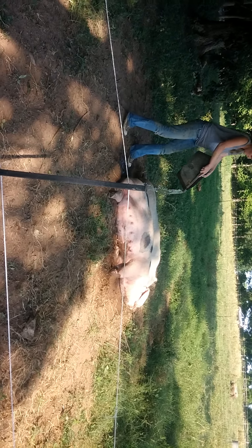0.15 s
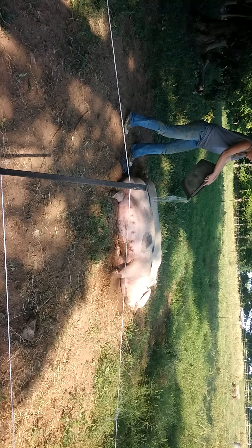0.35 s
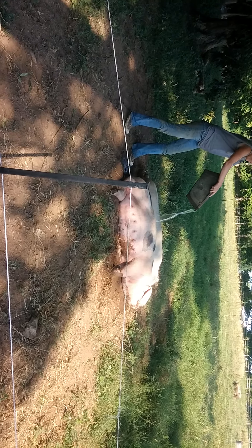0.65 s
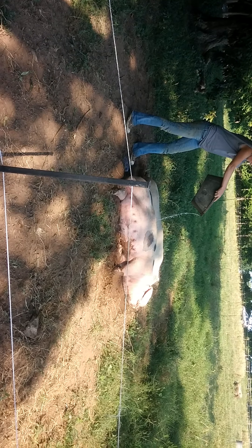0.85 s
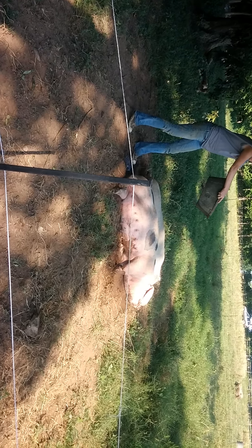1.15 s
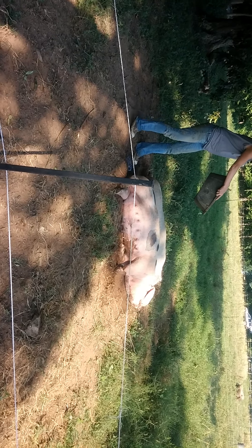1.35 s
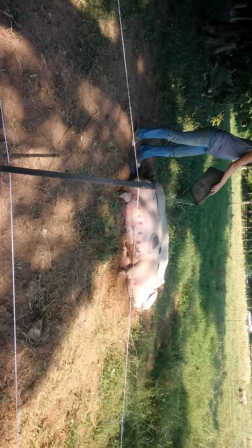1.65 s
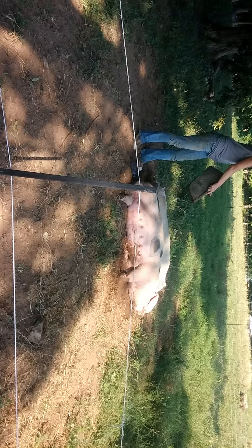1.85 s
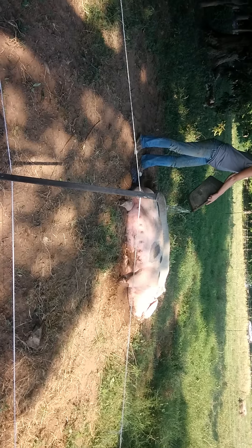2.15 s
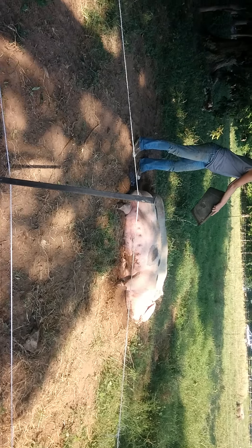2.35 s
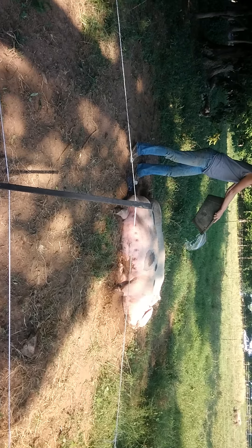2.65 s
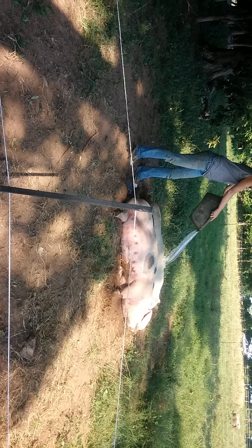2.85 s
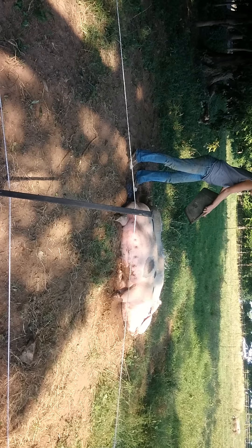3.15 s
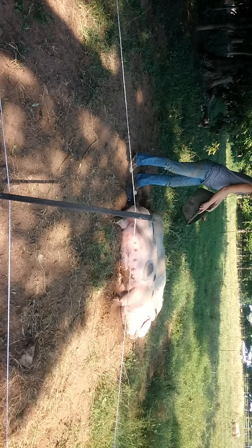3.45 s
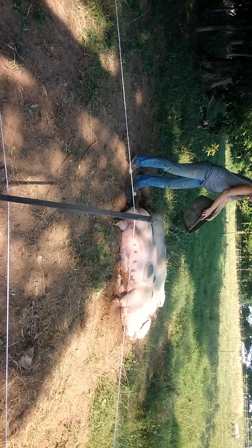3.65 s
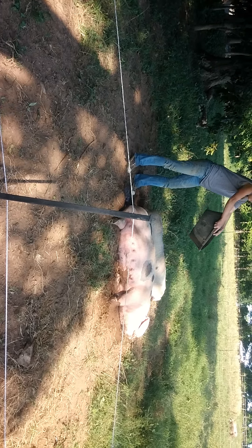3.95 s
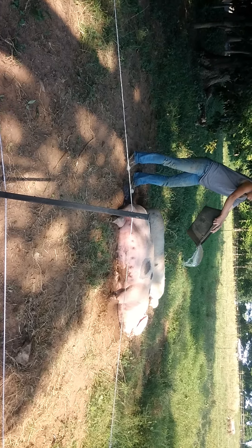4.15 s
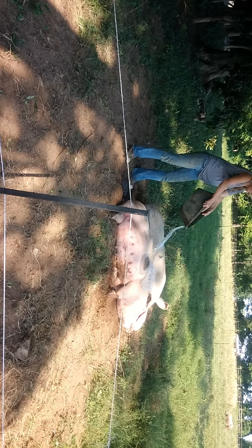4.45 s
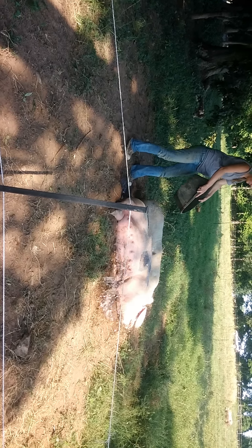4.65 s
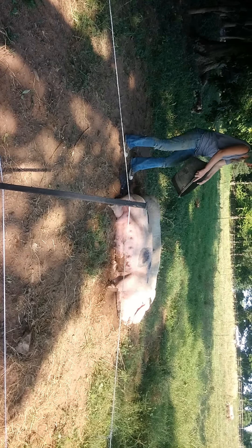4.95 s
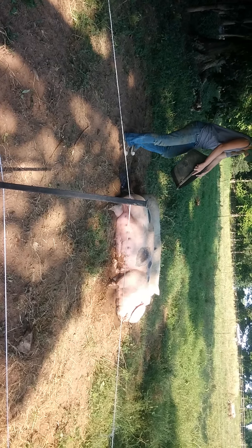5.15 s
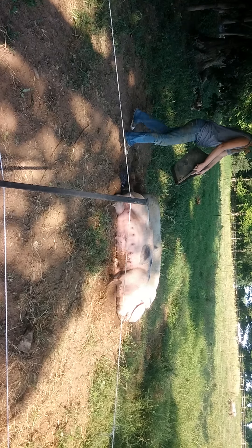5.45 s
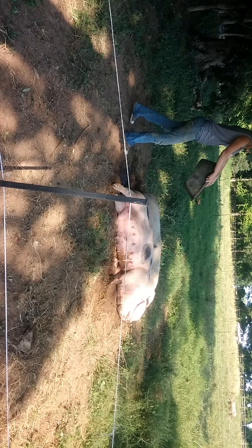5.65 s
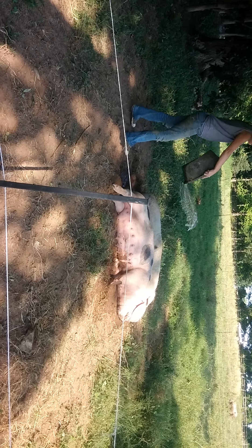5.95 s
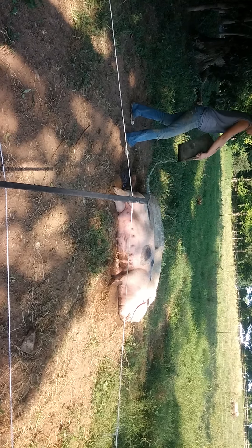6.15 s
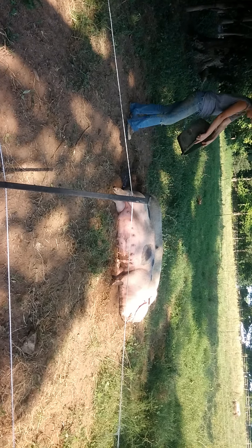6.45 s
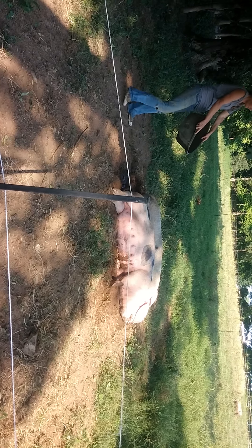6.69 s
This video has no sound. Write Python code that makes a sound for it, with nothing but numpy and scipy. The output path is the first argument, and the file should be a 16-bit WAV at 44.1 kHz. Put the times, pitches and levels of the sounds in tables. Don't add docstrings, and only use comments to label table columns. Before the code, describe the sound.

Outdoors, close to a large pig, with lumpy low wind on the microphone, heavy on the left early and shifting right after about 4.5 seconds. At 0 a wet snuffle and crisp ticking drops, a faint rattle at 0.2. A low, rough, fluttering grunt comes at 0.6 to 0.9, with a strong wind thump at 1.2, another grunt at 1.5, and snuffling at 1.7. Light drops patter from 1.8 to 2.4; a short rattle and nasal breath follow around 2.5 to 2.8. Soft splashes land at 3.0 to 3.2. Grunts return at 3.4 and 4.15, then a sharp double slap of water at 4.5 with trailing drops. A tight louder grunt at 5.0 runs into nasal rattles until 5.4. Another grunt at 5.8, rattles at 6.0 to 6.2, the hardest splash at 6.27, and a strong closing grunt at 6.7. Brief fades dip the sound, deepest near 1.4, 2.9, 3.3, 3.7 and 5.55.

```python
import sys
import numpy as np
from scipy import signal
from scipy.fft import rfft, irfft, next_fast_len
from scipy.io import wavfile
from scipy.ndimage import map_coordinates

SR = 44100
rng = np.random.default_rng(int(sys.argv[2]) if len(sys.argv) > 2 else 0)


def dump_mix(stems):
    frames = np.atleast_2d(stems).T
    limited = np.clip(frames, -1, 1)
    pcm = np.round(limited * 32767).astype(np.int16)
    wavfile.write(sys.argv[1], SR, pcm)


def voltage_ratio(level):
    return 10 ** (np.asarray(level, float) / 20)


N = 300762

# peak in seconds, level in dB, rise and fall in seconds per 20 dB, nostrils over nose in dB.
SNUFFLES = [(0, -40, .06, -0.08, -18), (0.278, -54.5, 0.4, 0.3, -12), (.69, -47, 0.02, 0.23, 0),
            (.91, -50.5, 0.1, 0.2, 2.5), (1.51, -59.5, 9.5, 0.54, -13), (1.711, -40.5, 0.13, 0.2, -8),
            (2.56, -59, 0.3, 0.5, -16), (2.75, -39.5, 0.19, 0.23, -6.5), (3.08, -52.5, 0.2, -0.07, 6),
            (3.42, -50, -0.9, 0.6, -3), (3.81, -52.5, -0.14, 0.33, 1), (4.02, -58.5, -1.2, 1, -6),
            (4.23, -54, 0.2, 0, -9), (4.441, -41.5, 0.12, 0.35, -10), (4.78, -45, 0.12, 0.12, -9),
            (5.01, -49, 0.2, 0.06, -6), (5.11, -62, 0.5, 0.62, 8), (5.3, -47.5, 0.16, 0.09, -3),
            (5.83, -59, -0.2, 0.5, -3), (6.08, -54, 0.23, 0.5, 6.5), (6.28, -42.5, -0.07, 0.3, -7),
            (6.72, -61, -6, 5, -11), (6.8, -66.5, 0.17, -4, 15.5)]
# centre in Hz, width in Hz, level in dB.
NOSE = [(490, 170, 3), (760, 170, -8), (1180, 175, -5.5), (1870, 310, 2)]
SNIFF = [(796, 410, 0.5), (1063, 76, -6), (1634, 310, -5), (2280, 390, -9)]
NOSTRILS = [(2550, 540, 7), (3230, 900, -3.5), (4690, 200, -4)]
# start in seconds, gain in dB.
FLUTTERS = [(0.708, 6), (0.834, 13.5), (1.618, 8.5), (1.643, 10.5), (1.679, 11), (1.72, 5), (1.764, 8.5),
            (2.656, 3.5), (2.682, 5), (2.732, 2), (2.76, 3), (2.786, 8), (2.824, 11.5), (4.405, 7),
            (4.785, 8.5)]
FLUTTER_S = 0.0066
# time in seconds, share from 0 to 1.
WIDE_PASSAGE = [
    (3.7, 0),
    (3.8, 1),
    (4.1, 0.93),
    (4.3, 0.031),
]
WIDE_TUNING = 0.93
SWELL_ROUND = 1.11

# peak in seconds, level in dB, rise and fall in seconds per 20 dB,
# spray over body in dB.
POURS = [(0, -40.5, .05, 0.18, -4), (0.182, -45, -0.8, 0.23, -8), (.45, -63, 3, 1.24, 5),
         (0.714, -47.5, 0.24, 0.61, -7), (1.0, -62.5, -1, 0.3, -3), (1.799, -48, 0.22, 0.22, -1.5),
         (1.95, -64.5, 0.3, 0.16, 12), (2.4, -68.5, -1.3, 0.3, 11.5), (2.7, -55.5, 1.7, 0.5, -6),
         (3.109, -37, 0.28, 0.35, -5.5), (3.21, -45.5, 0.33, 0.15, -1.5), (3.6, -59, 0, 0.45, -1),
         (4.1, -65, 1.5, -1, -3), (4.532, -38, 0.12, 0.2439, -3), (4.608, -31.5, 0.21, 0.17, -8),
         (4.841, -52, 0.24, 0.16, 9.5), (5.15, -57, 2, 0.66, -2.5), (5.4, -55, 0.4, 0.1, -4),
         (6.1, -58.5, 0.06, 1.5, 0), (6.296, -32, 0.0644, 0.1354, -5.5), (6.369, -42.5, 0.17, 0.2, -3.5),
         (6.7, -66.5, 1.9, 7, 6.5)]
# start in seconds, level in dB, time to die in seconds.
SURGES = [
    (0.088, -60, 0.56),
    (2.952, -54, 0.5),
    (4.786, -47.5, 0.35),
    (6.243, -30.5, 0.073),
    (3.028, -38, 0.11),
    (6.282, -27, 0.05),
]
# start in seconds, peak in dB, pitch in Hz.
DROPS = [(0.097, -23, 3600), (0.102, -27, 2750), (0.134, -25.5, 3300), (0.181, -30.5, 2590),
         (0.204, -22, 4000), (1.912, -35, 8000), (0.116, -29.5, 3900), (1.801, -28.5, 2550),
         (1.905, -32, 2650), (2.03, -30, 6950), (2.193, -37.5, 4000), (2.338, -27.5, 3840),
         (2.404, -28.5, 2560), (0.167, -30, 2650), (2.431, -29.5, 3300), (2.957, -23.5, 2550),
         (2.195, -37, 8000), (3.188, -24, 2950), (3.212, -21, 2470), (4.513, -10.5, 3450),
         (4.562, -12.5, 2110), (4.653, -21.5, 1760), (2.563, -36, 8000), (6.25, -19, 6600),
         (6.265, -11, 3220), (6.274, -11, 2530), (6.291, -22, 2750), (6.296, -15, 1650),
         (6.355, -15.5, 3570), (6.385, -24, 2550), (2.978, -35, 3150), (2.995, -31.5, 2380),
         (2.08, -37.5, 7300), (3.039, -26, 3360), (3.039, -30, 980), (3.045, -24, 2480), (3.076, -23, 2550),
         (3.092, -22, 3440), (3.113, -24, 2600), (3.115, -29, 1000), (3.226, -31, 2620),
         (4.516, -16.5, 3840), (4.57, -14, 2460), (4.606, -24, 1520), (4.626, -21, 1750),
         (4.745, -30, 3200), (4.858, -31, 2700), (2.191, -42.5, 1930), (2.405, -30, 3300),
         (0.002, -20.5, 3570), (0.142, -28.5, 3500), (6.303, -19.5, 2420), (6.287, -22, 1260),
         (1.948, -37, 8000), (6.282, -26, 1500), (6.29, -16, 1820), (6.303, -15.5, 1760),
         (6.299, -21, 1114), (6.306, -27, 1330), (6.274, -24.5, 1310)]
# start in seconds, peak in dB.
SMACKS = [
    (2.555, -47),
    (3.075, -38),
    (3.212, -32),
    (4.511, -20.5),
    (4.537, -21),
    (6.244, -27.5),
    (6.2726, -12.5),
    (6.357, -26),
    (6.3812, -28),
]
# frequency in Hz, density in dB per Hz.
SPLASH = [(1100, -11.5), (1800, -11), (2600, 4.5), (3400, 5), (4400, -3.5), (6500, -31)]
SPRAY = [(2500, -2.5), (5200, -2.5), (7300, 2), (9500, -4.5), (13000, -19), (16000, -23)]
SMACK = [(500, -18), (1000, 2.5), (2600, 1.5), (6500, 1), (10000, -16), (16000, -28)]
MIST = [(11000, -42), (14000, -7), (16000, -4)]
SPRAY_LINGERS = 1.15
PATTER_DB, PATTER_HZ = 0.5, 3110
MIST_DB, MIST_GROWS = -72, 1.2

# peak in seconds, level in dB, rise and fall in seconds per 20 dB.
LEFT_GUSTS = [(.2, -47, 4, .4), (.47, -28, -0.4, 0.17), (.7, -50, -2.5, 3), (1.04, -31.5, -1.2, 2),
              (1.22, -20.5, 0.04, 0.18), (1.65, -17.5, 0.1, 0.15), (1.9, -25.5, 0.25, 0.64),
              (2.08, -29, 0, 0.7), (2.3, -28, -4, 0.08), (2.5, -21, 0.09, -0.14), (2.7, -33.5, -0.5, 0),
              (3.15, -54, 3, -3), (3.3, -39, -0.3, 2), (3.57, -25.5, 0, 0.8), (3.9, -24.5, 0.1, 0.36),
              (4.2, -31, 0.6, 0.1), (4.5, -33.5, -1.5, 0), (4.8, -34.5, -1.5, 1.15), (5.1, -30, 0.2, 0.4),
              (5.45, -39, 0, 0.7), (5.75, -35, 0.2, 0.5), (6.2, -31.5, 0.22, 0.5), (6.5, -33.5, -1, 0.5),
              (6.73, -27, -0.1, -2.3)]
RIGHT_GUSTS = [(.3, -63, .8, 0.265), (.7, -39.5, 0.074, 0.093), (.95, -58, 0.36, 0.14),
               (1.62, -43, 0.19, 0.19), (2.6, -63.5, 0.18, .15), (2.8, -53, 0.085, 0.18),
               (3.2, -62, 0.34, .2), (3.5, -50, 0.159, 0.16), (4.0, -51.5, 0.6, 0.33),
               (4.5, -40.5, 0.23, 0.56), (4.72, -33, 0.27, 0.25), (5.0, -28.5, 0.074, 0.075),
               (5.35, -41.5, 0.25, 0.19), (5.8, -36.5, 0.1, 0.19), (6.0, -36, 0.3, 0.095),
               (6.2, -21.5, 0.054, 0.11), (6.4, -27, 0.083, 0.3), (6.56, -23.5, 0.32, 0.2),
               (6.8, -35.5, 0.4, .3)]
# middle in seconds, depth in dB, half length in seconds.
LULLS = [(0.02, 8, 0.05), (0.66, 6, 0.06), (0.82, 30, 0.12), (0.92, 13, 0.058), (2.7, 3.5, 0.039),
         (4.03, 2.5, 0.077), (1.49, 7, 0.038), (2.17, 10, 0.06), (2.97, 6, .07), (3.11, 5, 0.05),
         (4.36, 7, 0.14), (5.62, 1.5, 0.034), (6.14, 1, 0.043)]
# frequency in Hz, density in dB per Hz.
RUMBLE = [(32, -23), (62, 2), (80, 3), (125, -2.5), (180, -12.5), (270, -28.5), (420, -46.5), (700, -110)]
# middle in seconds, peak in dB, pitch in Hz, port (0 left, 1 right).
THUMPS = [(1.203, -2.5, 120, 0), (1.652, -17, 80, 0), (1.882, -12, 99, 0), (1.948, -7.5, 95, 0),
          (2.251, -9.5, 144.6, 0), (3.812, -9.5, 96.4, 0), (3.88, -15, 170, 0), (4.961, -9, 110, 1),
          (3.458, -13.5, 114, 0), (5.118, -16, 84, 0), (5.33, -21.5, 118, 0), (.422, -23, 105, 0),
          (0.477, -20.5, 115, 0), (0.537, -21, 95, 0), (6.178, -20.5, 91, 1), (6.212, -21, 129, 1),
          (3.49, -19.5, 100, 0), (5.694, -23, 90, 0)]

# start in seconds, spacing in seconds, flaps, first level in dB, loss in dB a flap.
RATTLES = [(0.219, 0.036, 4, -40, 0), (0.872, .034, 2, -25.5, -2.5), (2.489, 0.041, 2, -40.5, -16.5),
           (2.564, .018, 2, -25, 18), (5.011, .03, 2, -30.5, 6.5), (5.056, 0.045, 2, -38.5, 4.5),
           (5.126, 0.026, 2, -39, -7.5), (5.176, 0.0288, 3, -29, 3.5), (5.292, 0.03, 2, -31, 9),
           (5.338, 0.022, 3, -32.5, 6), (5.974, .029, 2, -34, -2), (6.03, 0.018, 2, -40.5, 4),
           (6.128, 0.012, 2, -40, 2), (6.16, 0.013, 3, -34, 1), (6.207, .036, 2, -30, -6)]
# first slow flap in seconds, spacing in seconds, slow flaps,
# quick lead-in flaps, full level in dB.
GRUNTS = [
    (0.651, .033, 2, 3, -18),
    (1.484, 0.032, 3, 1, -15.5),
    (3.424, 0.036, 1, 3, -18.5),
    (4.153, 0.0353, 3, 1, -17),
    (4.968, .018, 2, 1, -14),
    (5.807, 0.037, 1, 3, -18.5),
    (6.717, 0.033, 3, 1, -13.5),
]
LEAD_S, QUICK_S = 0.0225, 0.0175
SHORT_DB, SHORT_LEFT = 18, 0.47
CLOSING_DB = -16.5
# frequency in Hz, level in dB, time to fall 60 dB in seconds.
CHEST = [(144.5, -5.5, 0.22), (209.4, 5, 0.056), (286.4, 6.5, 0.049)]
THROAT = [(488, -8, 0.047), (764, 6, 0.018)]
MOUTH = [(1195, -1.2, 0.044)]
PALATE = [(1750, -6, 0.037)]
SNOUT = [(2650, -3, 0.024), (3300, -4, 0.018), (3840, -3.5, 0.023)]
# time in seconds, snout over throat in dB.
NASAL = [(0.26, 3), (0.65, -13), (0.685, -9.5), (0.875, 4), (0.905, -6.5), (1.46, -10), (1.485, -2),
         (1.517, -8), (1.55, -18), (2.5, -13.5), (3.385, -14), (3.41, -6), (4.13, -16), (4.155, 3),
         (4.19, -13), (4.23, -20), (4.97, -8), (5.05, 15), (5.15, 7), (5.22, 9), (5.33, -4.5),
         (5.78, -15.5), (5.81, 5), (6.0, 5), (6.15, -11.5), (6.75, -3)]
# time in seconds, mouth ring in dB, palate ring in dB.
OPEN = [(0.25, -18, -21), (0.66, 3, 0.5), (0.88, -0.5, -1.5), (1.48, -2.5, 0), (1.55, 0, -4),
        (2.55, -2, -4.5), (3.42, -1, 0.5), (4.15, -2, 8), (4.19, 1.5, -1.5), (4.22, -2.5, 0.5),
        (4.97, 4, 2.5), (5.03, 1.5, 11), (5.15, 0.5, 7), (5.21, -7.5, -8.5), (5.33, 0, -17),
        (5.78, -0.5, -10), (5.807, 7.5, -0.5), (6.0, -1.5, -2.5), (6.2, -4.5, -17.5), (6.75, 1.5, -3.5)]
# time in seconds, frequency in Hz.
PALATE_HZ = [(0.65, 1805), (0.87, 1740), (1.48, 1840), (1.52, 1750), (4.22, 1826), (4.97, 1670),
             (4.99, 1630), (5.05, 1856), (5.18, 1710), (5.34, 1800), (5.8, 1660), (6.0, 1710), (6.72, 1870),
             (6.75, 1700)]
# time in seconds, upper over lower snout rings in dB.
TIP = [(.66, -2), (.875, 7.5), (.905, -3), (1.485, -11), (1.517, 2.5), (2.55, -5), (3.42, -15.5),
       (4.155, -7), (4.19, 2.5), (4.225, 1), (4.97, 6.5), (4.99, 6.5), (5.1, 0), (5.125, 11), (5.18, 11.5),
       (5.235, -9), (5.32, 2), (5.81, -2.5), (5.974, -6), (6.003, 0), (6.75, 6)]
# time in seconds, lower snout ring in Hz, top over middle ring in dB.
FLARE = [(.65, 2624, -6), (.875, 2640, -6), (1.485, 2530, -16), (1.55, 2500, -2), (2.55, 2570, -6),
         (3.42, 2580, -9.5), (4.155, 2550, -16), (4.19, 2550, 10), (4.97, 2930, -14), (4.99, 3050, -4),
         (5.04, 2840, 6), (5.1, 2650, -1), (5.2, 2690, -5), (5.3, 2650, 8), (5.81, 2630, 9),
         (5.974, 2650, -10), (6.003, 2650, 10), (6.72, 2550, -13), (6.75, 2810, 4.5)]
CHEST_DB, CHEST_STEADY, CHEST_SHUT = -6.5, 0.25, 0.4
DULL, MUFFLED = 0.35, 0.66
THROAT_SHUT = 0.33
LEAKY, PUFF_LEAD_S = 0.45, 0.0043

# frequency in Hz, density in dB per Hz.
HISS = [(60, -2.5), (800, -2), (3000, -10), (5000, -13), (12500, -19.5), (16000, -35)]
# frequency in Hz, left minus right in dB.
LEFT_DB = [(300, 4.5), (520, -9), (850, 3.5), (1500, -8.5), (2500, -16), (4500, -14.5), (8000, -13.5),
           (14000, -8)]
# frequency in Hz, lead in radians.
LEFT_LEAD = [(300, 2.69), (700, 2.437), (1100, 1.64), (2700, 1.68), (4000, 3.6), (16000, 32.9)]
# frequency in Hz, share from 0 to 1.
ALIKE = [(1200, 1), (3500, 0.41), (12000, 0.19)]
# middle in seconds, depth in dB, half length in seconds.
FADES = [(0.065, 17.5, 0.045), (0.573, 10, 0.016), (0.862, 7.5, 0.02), (1.431, 25.5, 0.036),
         (2.053, 8, 0.046), (2.362, 8.5, 0.045), (2.912, 36, 0.059), (3.297, 24, 0.055), (3.727, 26, 0.092),
         (4.319, 5.5, 0.0282), (4.698, 6, 0.062), (5.271, 15, 0.036), (5.45, 14, 0.038),
         (5.558, 26, 0.0338), (5.944, 7.5, 0.044), (6.101, 6, 0.022)]


def unit(x):
    return x / np.sqrt(np.mean(x ** 2, axis=-1, keepdims=True) + 1e-20)


def along(points, hz):
    f, v = np.transpose(points)
    return np.interp(np.log(hz + 1), np.log(f + 1), v)


def wobble(rate):
    return map_coordinates(rng.standard_normal(N // 100), [np.arange(N) * rate / SR])


def filtered(x, response):
    m = next_fast_len(N + SR // 2)
    return irfft(rfft(x, m) * response(np.fft.rfftfreq(m, 1 / SR)), m)[..., :N]


def noise(spectrum, channels=1):
    white = rng.standard_normal((channels, N))
    return unit(filtered(white, lambda hz: voltage_ratio(along(spectrum, hz))))


def add(track, s, shapes):
    start = np.round(np.asarray(s) * SR).astype(int)
    at = start[:, None] + np.arange(shapes.shape[1])
    track += np.bincount(at.ravel(), shapes.ravel(), N + SR)[:N]
    return track


def swells(s, db, rise, fall):
    grid = np.arange(0, N + 64, 64)
    t = grid / SR - s[:, None]
    away = np.where(t < 0, -t / np.abs(rise[:, None]), t / np.abs(fall[:, None]))
    power = voltage_ratio(2 * (db[:, None] - 20 * away ** SWELL_ROUND)).sum(axis=0)
    return np.interp(np.arange(N), grid, 10 * np.log10(power + 1e-12))


def dips(rows):
    t = np.arange(N) / SR
    return sum(db * np.cos(np.pi / 2 * np.clip((t - s) / half, -1, 1)) ** 2 for s, db, half in rows)


def air():
    s, db, rise, fall, nostril_db = np.transpose(SNUFFLES)
    at, pour_db, up, down, spray_db = np.transpose(POURS)
    return (swells(s, db, rise, fall), swells(s, db + nostril_db, rise, fall),
            swells(at, pour_db, up, down), swells(at, pour_db + spray_db, up, SPRAY_LINGERS * down))


def nasal(modes, wide=0):
    def passage(f):
        return sum(voltage_ratio(db) * (1j * f * w / (c * c - f * f + 1j * f * w)) ** 2 for c, w, db in modes)

    both = filtered(rng.standard_normal(N), lambda f: np.array([passage(f), passage(f / WIDE_TUNING)]))
    usual, sunk = unit(both)
    return (1 - wide) * usual + wide * sunk


def breath(breath_db, nostril_db):
    s, db = np.transpose(FLUTTERS)
    u = np.arange(SR // 20) / SR / FLUTTER_S
    palate_db = add(np.zeros(N), s, db[:, None] * np.e * u * np.exp(-u))
    flutter = voltage_ratio(2.7 * wobble(75) + palate_db)
    wide = np.clip(np.interp(np.arange(N) / SR, *np.transpose(WIDE_PASSAGE)), 0, 1)
    nose = voltage_ratio(breath_db - 2.5) * nasal(SNIFF, wide)
    nostrils = voltage_ratio(nostril_db - 2.5) * nasal(NOSTRILS, wide)
    return flutter * (nose + nostrils)


def bubbles(s, db, hz, cycles, rise):
    u = np.arange(400) / SR * hz[:, None] / cycles
    shape = np.sin(2 * np.pi * cycles * (u + rise * u * u)) * np.exp(-u) * (1 - np.exp(-6 * u))
    return add(np.zeros(N), s, voltage_ratio(db)[:, None] * shape)


def splash_body(splash_db):
    u, pitch, size = rng.random(9000), rng.standard_normal(9000), rng.random(9000)
    heavy = voltage_ratio(-0.12 * np.clip(splash_db[(u * N).astype(int)] + 44, 0, 13))
    hz = 2900 * heavy * np.exp(0.32 * pitch)
    dense = bubbles(u * N / SR, 9.7 * size ** 1.2, hz, cycles=4.3, rise=0.02)
    return unit(voltage_ratio(1.7 * wobble(90)) * (0.85 * unit(dense) + noise(SPLASH)[0]))


def slaps():
    s, db, hz = np.transpose(DROPS)
    t = np.arange(600) / SR
    grain = (noise(SPRAY) + 2.12 * noise(SPLASH))[0, :len(s) * len(t)].reshape(len(s), -1)
    crack = voltage_ratio(db[:, None] - 14 - 60 * t / 0.022) * (1 - np.exp(-t / 0.0013)) * grain
    struck = bubbles(s, db + 2, hz, cycles=5.4, rise=0.0077) + add(np.zeros(N), s, crack)
    s, db = np.transpose(SMACKS)
    grain = noise(SMACK)[0, :len(s) * len(t)].reshape(len(s), -1)
    return add(struck, s, voltage_ratio(db[:, None] - 60 * (t / 0.0047) ** 2) * grain)


def patter(spray_db):
    u, size, pitch = rng.random((700, 3)).T
    db = spray_db[(u * N).astype(int)] + PATTER_DB + 17 * size ** 2
    return bubbles(u * N / SR, db, PATTER_HZ * np.exp(0.7 * (pitch - 0.4)), cycles=5.5, rise=0.018)


def wetness(splash_db):
    return np.clip((splash_db + 56) / 9, 0.45, 1)


def water(splash_db, spray_db):
    body = splash_body(splash_db)
    spray = unit(voltage_ratio(1.6 * wobble(70) + 1.33 * wobble(300)) * noise(SPRAY)[0])
    s, db, die_s = np.transpose(SURGES)
    t = np.arange(SR // 2) / SR
    surge = add(np.zeros(N), s, voltage_ratio(db[:, None] - 60 * (t / die_s[:, None]) ** 2))
    wet = (voltage_ratio(splash_db + 2) * wetness(splash_db) + surge) * body
    wet += (voltage_ratio(spray_db) + voltage_ratio(-8.5) * surge) * spray
    wet += slaps() + patter(spray_db)
    wet += (voltage_ratio(MIST_DB + MIST_GROWS * (spray_db + 56)) + voltage_ratio(-30) * surge) * noise(MIST)[0]
    return filtered(wet, lambda hz: 1 / (1 + (800 / (hz + 1)) ** 8))


def wind():
    lumps = voltage_ratio(np.array([3.8 * wobble(32) + 3 * wobble(13) for port in range(2)]))
    gust_db = np.array([swells(*np.transpose(gusts)) for gusts in (LEFT_GUSTS, RIGHT_GUSTS)])
    ports = voltage_ratio(gust_db - dips(LULLS)) * unit(lumps * noise(RUMBLE, channels=2))
    t = np.arange(-SR // 20, SR // 20) / SR
    for s, db, hz, port in THUMPS:
        push = voltage_ratio(db) * np.cos(2 * np.pi * hz * (t - 16 * t * t)) / np.cosh(t * hz / 0.27)
        add(ports[round(port)], [s + t[0]], push[None])
    return ports


def flaps():
    rows = []
    for s, spacing, slow, quick, db in GRUNTS:
        times = [s - LEAD_S - QUICK_S * k for k in range(round(quick))][::-1]
        times += [s + spacing * k for k in range(round(slow))]
        rows += [(at, db, SHORT_DB * SHORT_LEFT ** k) for k, at in enumerate(times)]
        rows.append((times[-1] + spacing, db, -CLOSING_DB))
    for s, spacing, count, db, loss_db in RATTLES:
        rows += [(s + spacing * k, db - loss_db * k, 0) for k in range(round(count))]
    s, full_db, short_db = np.transpose([row for row in rows if row[0] < N / SR])
    db = full_db - short_db
    snout_db = np.interp(s, *np.transpose(NASAL))
    chest_db = CHEST_DB - CHEST_STEADY * (db + 20.5) - CHEST_SHUT * (snout_db + 5.5)
    return s, db, chest_db, snout_db - DULL * short_db, short_db


def ringing(modes, db, detune, glide, attack, spread_db=1.96, tuning=1, lift_db=0):
    t = np.arange(SR // 11) / SR
    hz, level, t60 = np.transpose(modes)[..., None]
    chance = rng.standard_normal((len(db), len(modes), 4))
    opening = glide * np.exp(0.465 * chance[..., 3:]) * 0.00478 * (1 - np.exp(-t / 0.0023))
    turns = hz * tuning * (1 + detune * chance[..., :1]) * (t - opening)
    decay = voltage_ratio(level + lift_db + spread_db * chance[..., 1:2] - 60 * t / t60)
    ring = decay * np.sin(2 * np.pi * turns + 0.68 * chance[..., 2:3])
    return voltage_ratio(db)[:, None] * ring.sum(axis=1) * (1 - np.exp(-t / attack))


def grunts():
    s, db, chest_db, snout_db, short_db = flaps()
    at, *levels = np.transpose(OPEN)
    mouth_db, palate_db = [np.interp(s, at, level) - MUFFLED * short_db for level in levels]
    tuning = np.interp(s, *np.transpose(PALATE_HZ))[:, None, None] / PALATE[0][0]
    tip_db = np.interp(s, *np.transpose(TIP))
    at, low_hz, top_db = np.transpose(FLARE)
    flare = np.interp(s, at, low_hz)[:, None, None] / SNOUT[0][0]
    lift_db = np.interp(s, at, top_db)[:, None, None] * [[-0.5], [0.5]]
    throat_db = db - THROAT_SHUT * np.clip(snout_db, 0, 20)
    knocks = np.zeros(N)
    for late, blow_db in [(-0.0045, -13.5), (0, 1.5), (0.012, -16)]:
        rings = ringing(CHEST, db + chest_db - 5.5 - 0.058 * short_db, detune=0.11, glide=0.011, attack=0.002)
        rings += ringing(THROAT, throat_db, detune=0.041, glide=0.086, attack=0.0013)
        rings += ringing(MOUTH, db + mouth_db, detune=0.02, glide=0.079, attack=0.0013)
        rings += ringing(PALATE, db + palate_db, detune=0.018, glide=0.011, attack=0.0016, tuning=tuning)
        rings += ringing(SNOUT[:1], db + snout_db - tip_db / 2, detune=0.014, glide=0.02, attack=0.0019,
                         spread_db=2.0, tuning=flare)
        rings += ringing(SNOUT[1:], db + snout_db + tip_db / 2, detune=0.025,
                         glide=np.array([[0.04], [0.12]]), attack=0.0019, spread_db=1.5, lift_db=lift_db)
        add(knocks, s + late, voltage_ratio(blow_db) * rings)
    t = np.arange(SR // 8) / SR
    puff = voltage_ratio((db + LEAKY * short_db)[:, None] - 23 - 60 * t / 0.13) * (1 - np.exp(-t / 0.0033))
    puffs = add(np.zeros(N), s - PUFF_LEAD_S, puff)
    return knocks + puffs * (nasal(NOSE) + 0.14 * nasal(NOSTRILS))


def field(x):
    t = np.arange(SR // 3) / SR
    tail = rng.standard_normal(len(t)) * voltage_ratio(-60 * t / 0.57) * (t > 0.006)
    return x + voltage_ratio(-18) * signal.fftconvolve(x, tail / np.linalg.norm(tail))[:N]


def scene():
    breath_db, nostril_db, pour_db, spray_db = air()
    voice = field(grunts())
    direct = voice + breath(breath_db, nostril_db) + water(pour_db, spray_db)
    scattered = voice + breath(breath_db, nostril_db) + water(pour_db, spray_db)
    alike = lambda hz: np.clip(along(ALIKE, hz), 0, 1)
    left = filtered(direct, alike) + filtered(scattered, lambda hz: np.sqrt(1 - alike(hz) ** 2))
    left = filtered(left, lambda hz: voltage_ratio(along(LEFT_DB, hz)) * np.exp(1j * along(LEFT_LEAD, hz)))
    return np.array([left, direct]) + wind() + voltage_ratio([[-62], [-66]]) * noise(HISS, channels=2)


def low_pass(x):
    return signal.sosfilt(signal.butter(12, 16440, fs=SR, output="sos"), x)


def record(dry):
    band = lambda hz: (hz < 15780) / (1 + (40 / (hz + 1)) ** 6)
    faded = dry * voltage_ratio(-dips(FADES)) + voltage_ratio(-83) * noise(HISS, channels=2)
    return low_pass(filtered(faded, band))


dry = scene()
out = record(dry)
dump_mix(out)
```